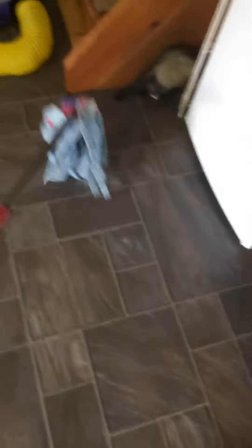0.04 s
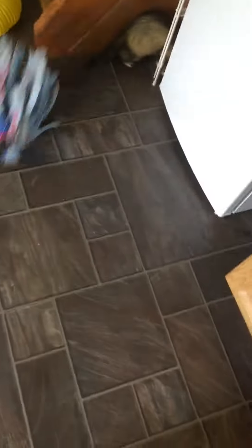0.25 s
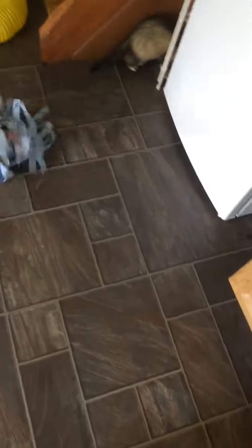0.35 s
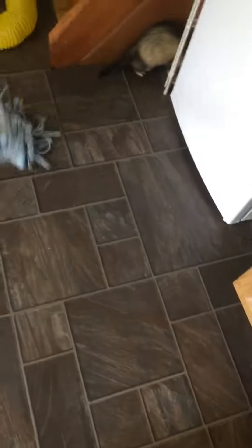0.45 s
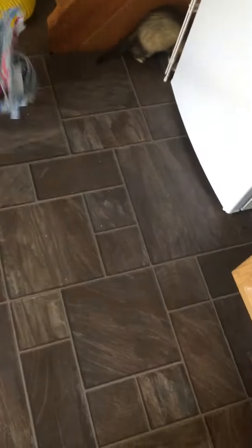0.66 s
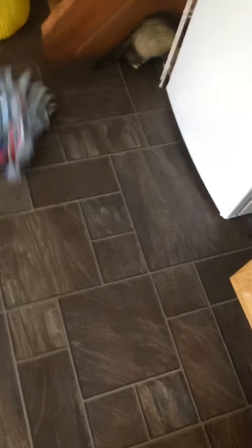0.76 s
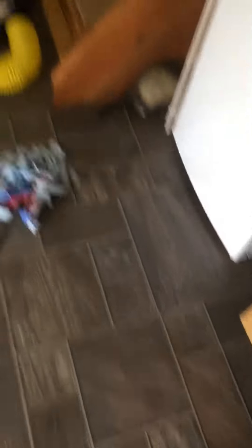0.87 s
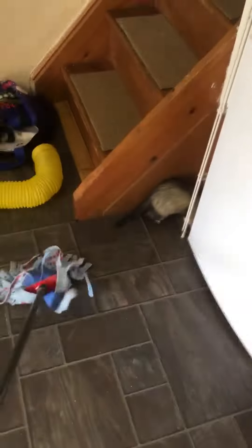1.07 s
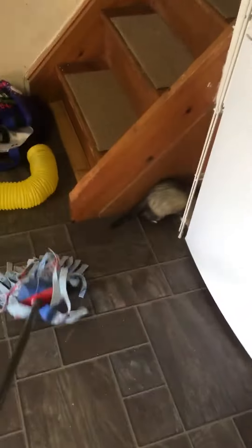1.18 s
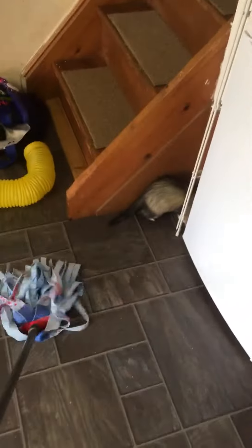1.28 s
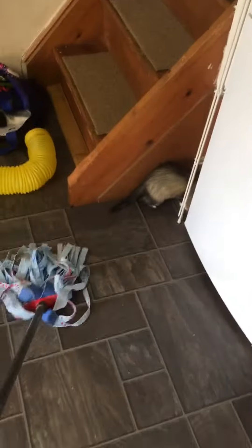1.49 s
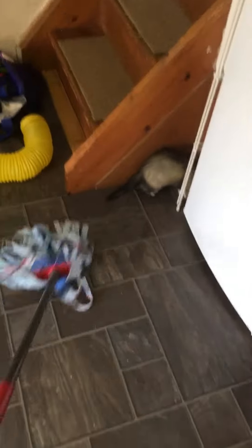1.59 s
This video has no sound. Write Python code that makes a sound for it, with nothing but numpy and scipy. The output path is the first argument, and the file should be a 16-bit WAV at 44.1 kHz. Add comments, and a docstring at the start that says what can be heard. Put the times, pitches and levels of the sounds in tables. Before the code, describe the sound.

A string mop slaps and clacks on a hard floor three times, the last lightly.

```python
"""In a small hallway, a string mop is swung and slapped on a hard floor three times, the last lightly.
The strands swish and land first; then the plastic head clacks in a quick cluster of contacts, each
exciting its damped modes, and under the first two strokes the floor thuds. The handle bumps and rustles,
and deep soft thumps come between the strokes. The room reverberates briefly after each stroke,
over quiet air and a thin, very high hiss."""
import sys
import numpy as np
from scipy import signal
from scipy.fft import rfft, irfft
from scipy.io import wavfile

SR = 44100
rng = np.random.default_rng(int(sys.argv[2]) if len(sys.argv) > 2 else 0)


def wav_out(sig):
    """Save sig, one row per channel (or a flat mono array), as 16-bit PCM at SR to the path in sys.argv[1]."""
    wavfile.write(sys.argv[1], SR, np.round(np.clip(np.atleast_2d(sig).T, -1, 1) * 32767).astype(np.int16))


N = 72765
TIME = np.arange(N) / SR
RING_TIME = TIME[:SR // 2]

# Contacts of the mop head. Each row: start in seconds, knock level in dB, clack level in dB,
# centre of the clack in Hz, slap level in dB.
CONTACTS = [(0.401, -23.5, -42, 3570, -29.5), (.410, -28.5, -23.5, 3060, -34),
            (0.4122, -25, -20, 2930, -32), (0.4154, -44, -20, 2830, -62), (0.4245, -32.5, -26, 2980, -41),
            (0.8866, -37.5, -28, 3100, -43.5), (.890, -25.5, -33.5, 3020, -44),
            (.8967, -57, -21, 3250, -41), (0.8993, -30, -31, 3130, -33.5),
            (0.9029, -25.5, -25, 2600, -35.5), (1.391, -43, -45.5, 3400, -65), (1.398, -50, -63, 3000, -55),
            (1.404, -41.5, -35, 3420, -48.5), (1.409, -41.5, -50, 3020, -55)]
# Modes of the hollow head, stiff socket and floor. Each row: frequency in Hz, level in dB, T60 in seconds.
HEAD_MODES = [(662, -13, 0.08), (851, -3.5, 0.02), (956, -1, 0.029), (1209, -7.5, 0.038), (1332, -3, 0.023),
              (1482, 0, 0.02), (1544, -8, 0.043), (1932, -14.5, 0.05)]
SOCKET_MODES = [(2935, -1, 0.035), (3130, -1.5, 0.0053), (3246, -4.5, 0.026), (3680, -7, 0.028)]
FLOOR_MODES = [(47.3, -8, 0.14), (93, -5, 0.64), (164, 0, 0.078), (206, -8, 0.079), (291.5, -13, 0.2)]
# Modes of the handle. Each row: multiple of the bump's pitch, level in dB, T60 in seconds.
HANDLE_MODES = [(1, -3.5, 0.17), (1.27, -13.5, 0.063)]
# Blows on the floor and jolts of the handle tube. Each row: start in seconds, level in dB.
FLOOR_BLOWS = [(.4045, -37), (.4095, -28), (0.8905, -41.5), (.8966, -36)]
TUBE_JOLTS = [(0.409, -50.5), (.897, -48.5), (1.405, -56.5)]
# Handle bumps and small ticks. Each row: start in seconds, level in dB, pitch or band centre in Hz.
HANDLE_BUMPS = [(.863, -39.5, 314.5), (1.036, -53, 311.7), (1.11, -52.5, 344), (1.331, -49.5, 321)]
TICKS = [(0.208, -50, 1500), (0.256, -55, 2970), (0.489, -45.5, 7650), (1.212, -56.5, 1120),
         (1.2989, -53.5, 1780), (1.302, -62.5, 6200)]
# Deep thumps. Each row: start in seconds, length in seconds, level in dB, frequency in Hz.
THUMPS = [(0.219, 0.15, -35, 34.7), (0.552, 0.096, -43.5, 45.4), (0.639, 0.082, -34.5, 37.3),
          (0.703, 0.13, -50, 40.3), (1.498, 0.16, -54, 35.9)]
# Landing strands and handling rustles. Each row: start in seconds, level in dB, rise and T60 in seconds.
LANDINGS = [(0.356, -43, 0.0052, 0.5), (.42, -43.5, 0.009, 0.26), (.475, -53, 0.024, 0.094),
            (.84, -50.5, 0.05, 0.69), (.886, -44, 0.0023, 0.18), (1.372, -52, 0.026, 0.25)]
RUSTLES = [(.24, -53.5, 0.046, 0.44), (.358, -43, 0.048, 0.068), (.62, -58, 0.036, 0.24),
           (1.33, -59.5, 0.015, 0.2), (1.41, -57.5, 0.0092, 0.23)]
# Envelopes of the brushing strands and the high hiss. Each row: time in seconds, level in dB.
SWISH_LEVELS = [(0, -59.5), (.125, -61.5), (.165, -56), (.202, -47), (.24, -61), (.31, -66.5), (.35, -62.5),
                (.46, -61), (.492, -50.5), (.55, -59), (.64, -63), (.70, -58.5), (.79, -62.5), (.84, -70),
                (1.05, -69.5), (1.28, -76), (1.39, -65.5), (1.47, -73), (1.52, -62.5), (1.6, -72.5),
                (1.65, -62)]
HISS_LEVELS = [(0, -77), (.3, -66), (.78, -69), (.9, -80)]
# Spectra of the noises and of the room's tail. Each row: frequency in Hz, relative level in dB.
SLAP_SPECTRUM = [(200, 9), (500, 1), (1200, -0.5), (2100, -3), (3400, 8), (4900, -6), (6500, 1.5),
                 (8000, 1.5), (10500, -3.5), (14800, 2.5), (16000, 3.5)]
SWISH_SPECTRUM = [(150, 10), (600, -9), (1400, -4.5), (1900, -5), (3200, 2.5), (4800, -2), (6300, 1),
                  (10500, -1.5), (12500, 3.5), (15000, 0), (16000, -8)]
LANDING_SPECTRUM = [(100, 9.5), (220, 12), (450, -1), (950, 5.5), (2000, -1.5), (3300, -1), (4800, -6.5),
                    (6500, -3.5), (10500, -10), (15000, -7.5)]
TUBE_SPECTRUM = [(700, -22), (880, 5), (1100, -15), (2400, -9), (2850, 2.5), (3200, -13), (3680, -1),
                 (4200, -18), (6200, -17), (6800, -2), (7500, -34)]
RUSTLE_SPECTRUM = [(40, -15), (90, -3), (190, -2), (320, -9.5), (480, -14.5), (700, -21), (1500, -29),
                   (4000, -53)]
ROOM_SPECTRUM = [(60, 8), (250, -3), (600, -14), (1200, -5.5), (3000, -9), (7000, -5.5), (15000, -1)]
HISS_SPECTRUM = [(13300, -19), (14550, 15), (16000, -27)]
AIR_SPECTRUM = [(20, -34), (40, 1.5), (65, -4.5), (95, 3), (130, -7.5), (190, -1), (320, -13.5), (480, -18),
                (1100, -18.5), (3000, -24.5), (8000, -38), (16000, -25.5)]
# Reverberation time of the hallway. Each row: frequency in Hz, T60 (time to fall 60 dB) in seconds.
ROOM_T60 = [(80, 0.22), (300, 0.46), (1200, 0.44), (3000, 0.5), (7000, 0.33), (15000, 0.25)]


def mop_head():
    """Impact excitation: contacts slap and ring head and socket; where they land weights the socket modes."""
    hard_rise_s, hard_db = 0.00022, -18.5
    crack = 1 + amp(4) * np.exp(-RING_TIME / 0.0009)  # the first cycles stand out above the ring
    out = np.zeros(N)
    for start, knock_db, clack_db, centre_hz, slap_db in CONTACTS:
        socket = [(hz, db - 10 * (np.log2(hz / centre_hz) / 0.34) ** 2, t60)  # -10 dB at 0.34 octave
                  for hz, db, t60 in SOCKET_MODES]
        slap = burst(SLAP_SPECTRUM, slap_db, t60=0.043)
        body = sum(amp(db) * ring(modes, spread_db=3, detune=0.0074)
                   for db, modes in [(knock_db, HEAD_MODES), (clack_db, socket)])
        rise_s = hard_rise_s * np.sqrt(amp(hard_db - clack_db))  # strands cushion the lighter contacts
        onset = np.minimum(RING_TIME / rise_s, 1)
        add(out, start, onset * crack / crack[0] * body + slap)
    return out


def strands():
    """Friction and soft impact: the strands hiss as they are swung and dragged, and land in splats."""
    swish = fibres(SWISH_SPECTRUM) * envelope(SWISH_LEVELS)
    return swish + fibres(LANDING_SPECTRUM) * swells(LANDINGS)


def fibres(spectrum, snaps_per_s=5000, spread_db=7, snap_share=0.13):
    """Shot noise: many tiny, independent snaps of fibres add to a smooth hiss."""
    snaps = rng.standard_normal(N) * (rng.random(N) < snaps_per_s / SR)
    snaps *= amp(spread_db * np.minimum(rng.exponential(1, N), 4))
    hiss = rng.standard_normal(N)
    return colour(np.sqrt(snap_share) * unit(snaps) + np.sqrt(1 - snap_share) * hiss, spectrum)


def floor_thuds():
    """Modal response: each blow sets the floor's low modes into free vibration."""
    out = np.zeros(N)
    for start, db in FLOOR_BLOWS:
        add(out, start, amp(db) * ring(FLOOR_MODES))
    return out


def handle_tube(rise_s=0.0034, t60=0.3):
    """Resonance: each jolt leaves the handle tube shivering in a few broad bands."""
    return noise(TUBE_SPECTRUM) * swells([(start, db, rise_s, t60) for start, db in TUBE_JOLTS])


def handle_bumps():
    """Damped vibration: the moving handle bumps, each time at its own pitch, amid dull rustles."""
    out = noise(RUSTLE_SPECTRUM) * swells(RUSTLES)
    for start, bump_db, hz in HANDLE_BUMPS:
        modes = [(hz * multiple, db, t60) for multiple, db, t60 in HANDLE_MODES]
        add(out, start, amp(bump_db) * ring(modes))
    return out


def ticks():
    """Brief transients have broad spectra: each light tap is a short burst in a wide band."""
    step = 2 ** 0.61  # frequency ratio of 0.61 octave
    out = np.zeros(N)
    for start, db, hz in TICKS:
        band = [(hz / step ** 2, -24), (hz / step, -3), (hz, 0), (hz * step, -6), (hz * step ** 3, -24)]
        add(out, start, burst(band, db, t60=0.026))
    return out


def thumps(rise_s=0.0198, fall_s=0.058):
    """Tone bursts: a few very deep cycles that swell and die are heard as a thump."""
    out = np.zeros(N)
    for start, length, db, hz in THUMPS:
        t = np.arange(0, length, 1 / SR)
        shape = np.minimum(t / rise_s, 1) * np.minimum((length - t) / fall_s, 1)
        add(out, start, amp(db) * shape * np.sin(2 * np.pi * hz * t))
    return out


def room(x, delay_s=0.004, build_s=0.01, gain_db=-3.5):
    """Reverberation: reflections gather into a diffuse tail whose middle frequencies last longest."""
    hz, t, bands = signal.stft(rng.standard_normal(SR), SR, nperseg=256)
    decay = amp(-60 * t / read(ROOM_T60, hz)[:, None])
    tail = signal.istft(bands * decay, SR, nperseg=256)[1][:SR]
    tail *= np.minimum(TIME[:SR] / build_s, 1)
    tail = equalise(tail / np.linalg.norm(tail), ROOM_SPECTRUM)
    out = np.zeros(N)
    add(out, delay_s, signal.fftconvolve(x, tail))
    return amp(gain_db) * out


def high_hiss():
    """Narrow-band noise: a thin, very high hiss, strongest around the first stroke."""
    return noise(HISS_SPECTRUM) * envelope(HISS_LEVELS)


def air():
    """Stationary noise: the steady, mostly low background of a quiet room."""
    return amp(-61.5) * noise(AIR_SPECTRUM)


def ring(modes, spread_db=0, detune=0):
    """Superposition of damped modes of alternating sign, with optional scatter in level and tuning."""
    out = np.zeros(len(RING_TIME))
    for k, (hz, db, t60) in enumerate(modes):
        db += spread_db * rng.standard_normal()
        hz *= 1 + detune * rng.standard_normal()
        out += (-1) ** k * amp(db - 60 * RING_TIME / t60) * np.sin(2 * np.pi * hz * RING_TIME)
    return out


def burst(spectrum, db, t60):
    """Exponential decay of a sudden noise."""
    return noise(spectrum, len(RING_TIME)) * amp(db - 60 * RING_TIME / t60)


def swells(rows):
    """Summed envelopes, each a linear rise followed by exponential decay."""
    level = np.zeros(N)
    for start, db, rise_s, t60 in rows:
        decay = amp(db - 60 * np.maximum(RING_TIME - rise_s, 0) / t60)
        add(level, start, np.minimum(RING_TIME / rise_s, 1) * decay)
    return level


def envelope(levels):
    """Amplitude over time, interpolated in decibels."""
    return amp(np.interp(TIME, *np.transpose(levels)))


def noise(spectrum, length=N):
    """Gaussian noise with the given spectrum, at rms 1."""
    return colour(rng.standard_normal(length), spectrum)


def colour(x, spectrum):
    """Spectral shaping, at rms 1."""
    return unit(equalise(x, spectrum))


def equalise(x, spectrum):
    """Linear filtering: each frequency is multiplied by its gain."""
    hz = np.fft.rfftfreq(len(x), 1 / SR)
    return irfft(rfft(x) * amp(read(spectrum, hz)), len(x))


def read(points, hz):
    """Interpolation on a log-frequency axis."""
    point_hz, values = np.transpose(points)
    return np.interp(np.log(hz + 1), np.log(point_hz), values)


def amp(db):
    """Decibels as an amplitude ratio."""
    return 10 ** (np.asarray(db) / 20)


def unit(x):
    """Normalisation to rms 1."""
    return x / np.sqrt(np.mean(x ** 2) + 1e-20)


def add(mix, start_s, sound):
    """Superposition of a sound on the mix from its start time."""
    part = mix[max(round(start_s * SR), 0):][:len(sound)]
    part += sound[:len(part)]


def scene():
    """Superposition of all sources; two room responses crossfade, so echoes change as the mop moves."""
    mop = mop_head() + handle_tube() + handle_bumps() + ticks() + strands()
    turn = np.pi * TIME
    echoes = room(mop * np.cos(turn)) + room(mop * np.sin(turn))
    return (mop + echoes + air() + floor_thuds() + thumps() + high_hiss())[None]


def record(dry, cutoff_hz=15900):
    """Band limiting: a steep low-pass filter removes the highest treble."""
    lowpass = signal.firwin(511, cutoff_hz, window=("kaiser", 9), fs=SR)
    return signal.oaconvolve(dry, lowpass[None], "same")


dry = scene()
out = record(dry)
wav_out(out)
```